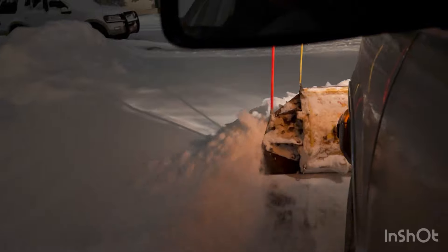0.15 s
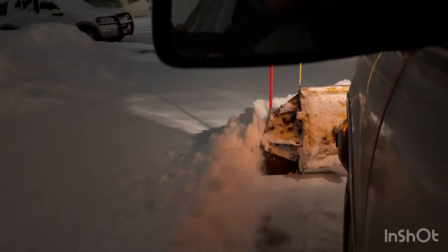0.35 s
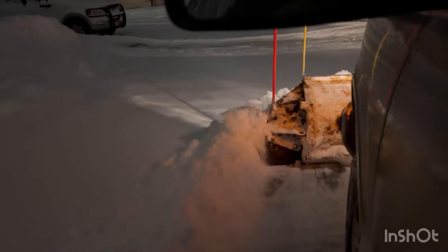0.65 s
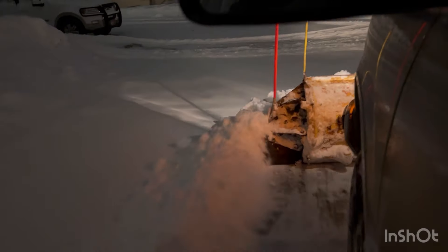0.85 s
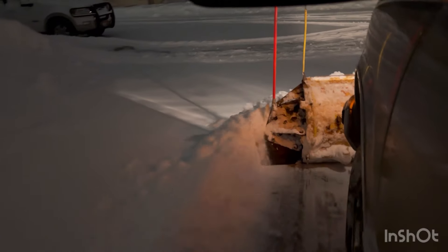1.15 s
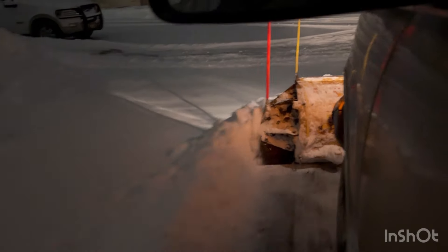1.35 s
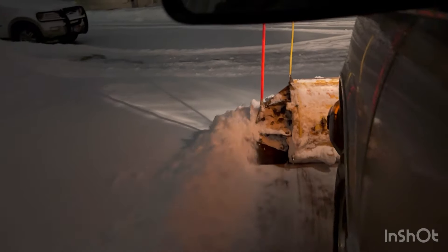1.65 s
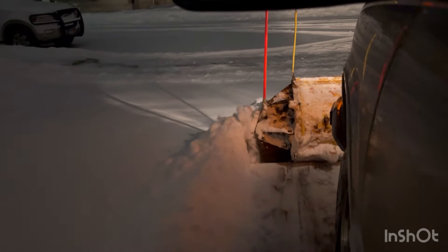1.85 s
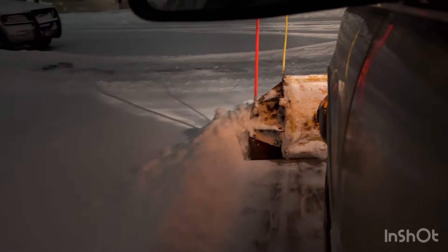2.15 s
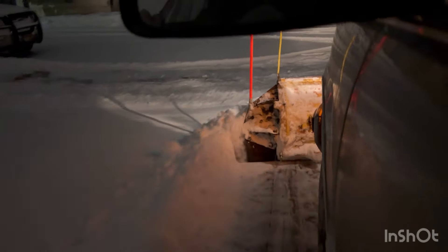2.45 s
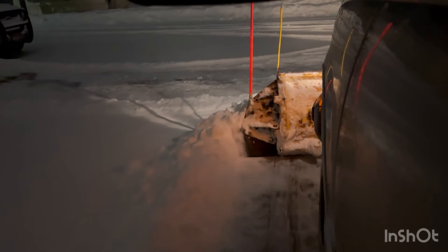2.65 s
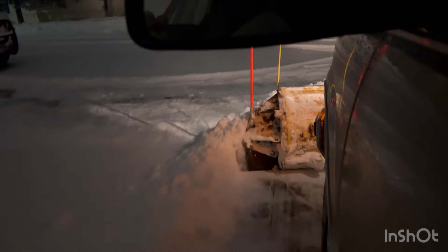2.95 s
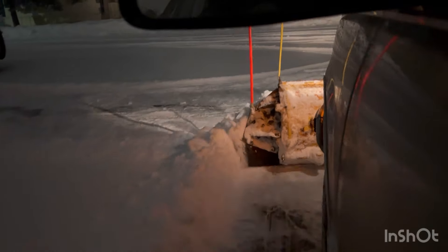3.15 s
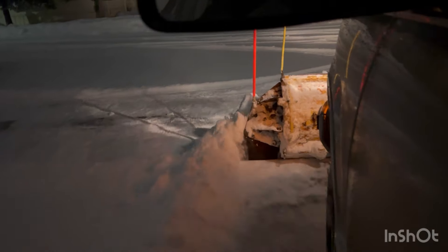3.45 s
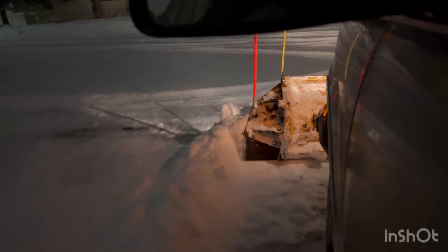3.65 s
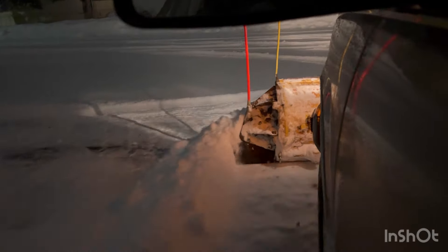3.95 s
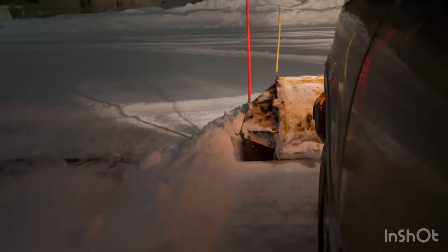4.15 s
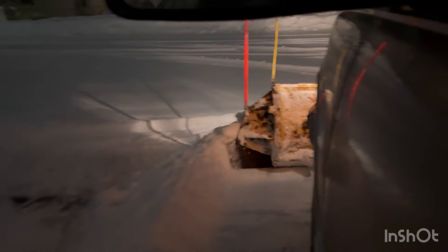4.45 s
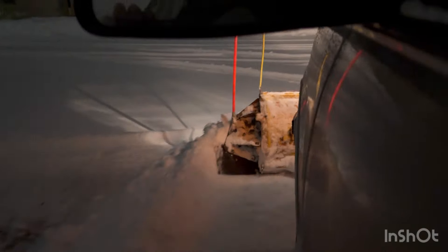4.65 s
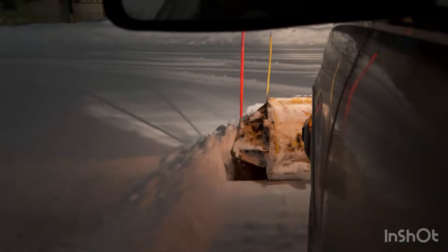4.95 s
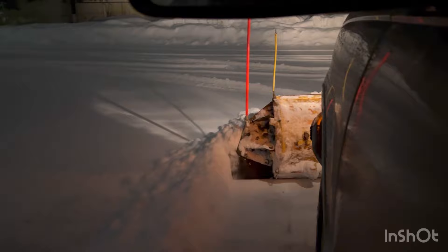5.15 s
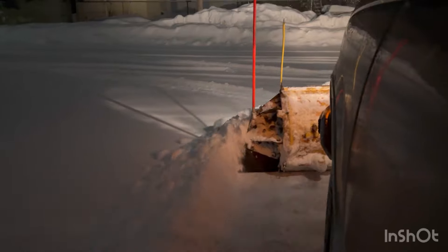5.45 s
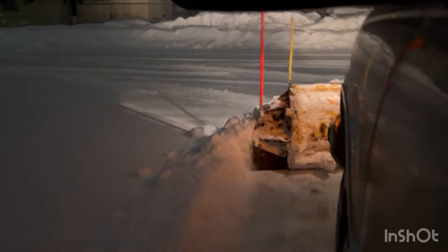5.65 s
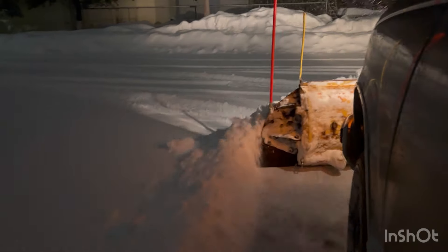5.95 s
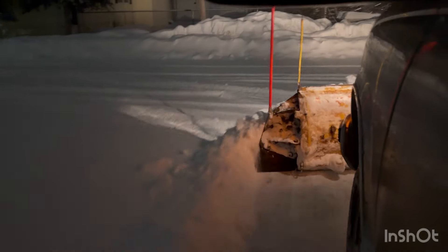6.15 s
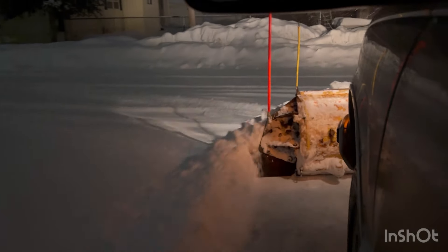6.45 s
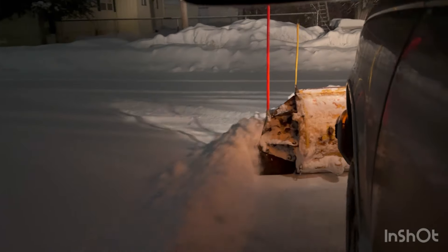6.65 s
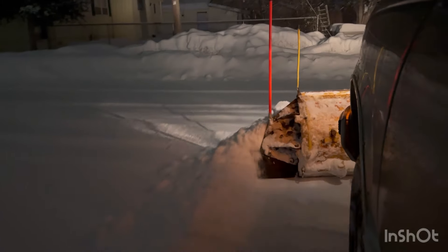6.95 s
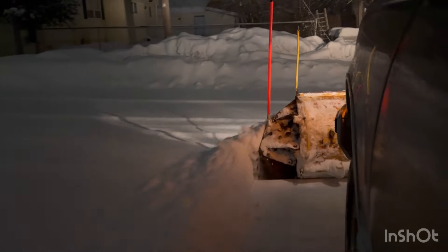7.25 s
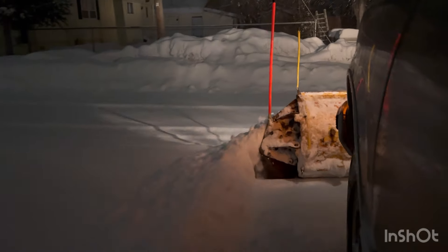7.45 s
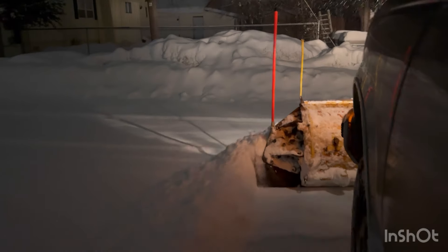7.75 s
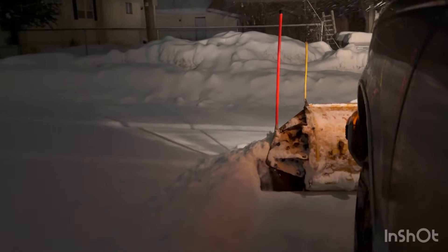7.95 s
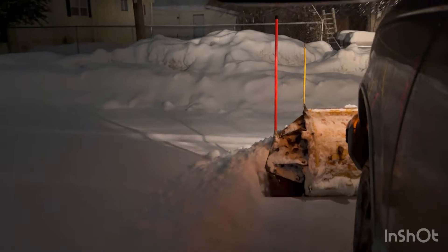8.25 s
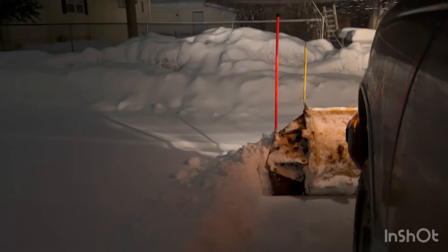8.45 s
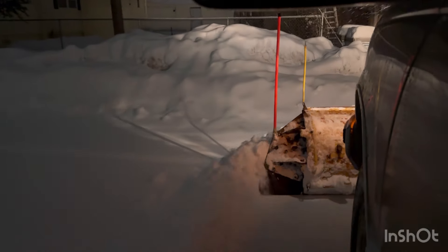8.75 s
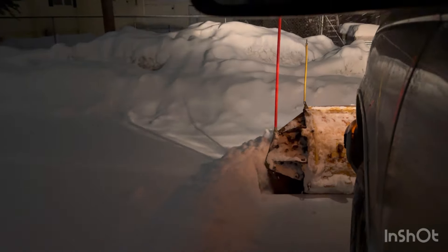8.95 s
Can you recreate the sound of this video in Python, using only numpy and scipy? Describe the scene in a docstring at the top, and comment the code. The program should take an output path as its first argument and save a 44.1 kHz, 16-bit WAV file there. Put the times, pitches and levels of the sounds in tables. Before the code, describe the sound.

Close outdoor stereo from a phone at a pickup's window. Throughout, a low V8 exhaust throbs with an uneven burble over a dull fan and tyre rush. From 0.1 s the steel plow blade drags in short, irregular judders: hollow booms, mid grinding, snow crunch, faint grit hiss and splintery ticks, strongest around 0.6-1.1 s as revs rise. From 1.2 to 4 s the scraping continues while revs slowly ease, with low catches, cracking crust and stones knocking on steel, clustered near 3.1-3.9 s. About 4.2-5 s it thins to a smoother glide, with one stone knock near 4.65. At 5-6 s the engine surges higher and rough scraping and cracks return. From 6 s, softer rolling crunch and powder spray dominate; revs stay high until 6.8, fall by 7.6, lift slightly around 8.3, then drop and weaken toward 9 s, with a few last grit ticks.

```python
"""Pickup plowing fresh snow

A V8 pickup pushes a steel plow, heard in stereo from a phone held out of the driver's window.
The exhaust throbs as sines on eighths of the firing rate. The blade edge judders over the ground:
noise and random impacts through resonances give boom, grind, snow crunch, grit hiss and spray.
Short fading sines are the edge's catches and the crust's cracks; noise bursts are grit and stones on steel."""
import sys
import numpy as np
from scipy import signal
from scipy.fft import rfft, irfft, next_fast_len
from scipy.io import wavfile
from scipy.ndimage import uniform_filter1d

SR = 44100
rng = np.random.default_rng(int(sys.argv[2]) if len(sys.argv) > 2 else 0)


def generate_wav(sig):
    """Save sig (samples, or channels by samples) to the path in sys.argv[1] as 16-bit PCM at SR."""
    pcm = np.round(np.clip(np.atleast_2d(sig).T, -1, 1) * 32767).astype(np.int16)
    wavfile.write(sys.argv[1], SR, pcm)


N = 400690

# treble resonances of the steel blade: pitch_hz, width_hz, level_db
STEEL_MODES = [(1930, 1200, 12), (3420, 1280, 12.5), (4990, 1660, 10), (7480, 3430, 4.5), (10560, 430, -5),
               (14600, 20500, -5)]


def undb(db):
    """Decibels to amplitude."""
    return 10 ** (np.asarray(db) / 20)


def unit(x):
    """Scale to rms 1."""
    return x / np.sqrt(np.mean(x ** 2))


def curves(table):
    """Columns of a time table, one value a sample."""
    s, *columns = np.transpose(table)
    return [np.interp(np.arange(N) / SR, s, column) for column in columns]


def over_log_hz(hz, table):
    """Second column of a frequency table, straight lines over log frequency."""
    table_hz, db = np.transpose(table)
    return np.interp(np.log(hz + 1), np.log(table_hz), db)  # + 1 avoids log 0


def body(x, modes):
    """Sum of steep resonances (each applied twice), neighbours in opposite sign."""
    out = 0
    for k, (hz, width_hz, db) in enumerate(modes):
        b, a = signal.iirpeak(hz, hz / width_hz, SR)
        ring = signal.lfilter(b, a, signal.lfilter(b, a, x))
        out = out + (-1) ** k * undb(db) * ring
    return out


def wavering_body(x, modes, waver_db, rate_hz):
    """Like body, but each resonance swells by itself."""
    out = 0
    for k, mode in enumerate(modes):
        swell = undb(waver_db * walk(rate_hz))
        out = out + (-1) ** k * swell * body(x, [mode])
    return out


def walk(rate_hz):
    """Random levels held 1 / rate_hz s and slewed twice; spread near 1."""
    k = int(SR / rate_hz)
    steps = np.repeat(rng.standard_normal(N // k + 1), k)
    return 1.5 * uniform_filter1d(uniform_filter1d(steps, k), k)[:N]


def grains(rate_hz, spread_db, smear_s):
    """Random impacts, many small and few large, each a short decaying burst of noise."""
    when, size, noise = rng.random(N), rng.exponential(size=N), rng.standard_normal(N)
    hits = (when < rate_hz / SR) * undb(spread_db * np.minimum(size, 5.0))
    envelope = signal.lfilter([1], [1, -np.exp(-1 / (smear_s * SR))], hits)
    return unit(envelope * noise)


def rings(table, rise_s, decay_s):
    """Each blow is a few fading cycles at its own pitch."""
    out, t = np.zeros(N + SR), np.arange(SR // 8) / SR
    envelope = np.exp(-t / decay_s) * (1 - np.exp(-t / rise_s))
    for start_s, db, hz in table:
        i = int(start_s * SR)
        out[i:i + len(t)] += undb(db) * np.sin(2 * np.pi * hz * t) * envelope
    return out[:N]


def engine():
    """Exhaust tones ride on the firing rate: it and its octave nearly steady, the others unsteady."""
    # engine speed: time_s, firing_rate_hz
    speed = [(0.1, 50.5), (0.3, 52.0), (0.7, 60.8), (0.85, 63.3), (1.1, 61.7), (2, 60.8), (3.5, 56.3),
             (4.7, 56.9), (4.95, 60.0), (5.4, 68.7), (5.6, 71.5), (6.2, 74.9), (6.75, 75.3), (7.2, 59.1),
             (7.6, 53.7), (7.9, 54.6), (8.15, 58.8), (8.35, 59.6), (8.55, 58.8), (8.75, 53.8), (9.0, 44.5)]
    # engine load: time_s, exhaust_level_db
    load = [(0.0, -22.5), (0.9, -19), (2.6, -20.5), (3.3, -19.5), (3.9, -21.5), (4.05, -23), (5.0, -22),
            (5.16, -16.5), (5.39, -23), (5.54, -18.5), (6.83, -18), (7.16, -22.5), (7.6, -22),
            (8.33, -19.5), (8.86, -22.5), (9.05, -29)]
    # exhaust tones, in eighths of the firing rate; unequal banks give all but 8 and 16
    eighths = [5, 6, 7, 8, 9, 10, 11, 13, 16]
    # relative level of each tone at the reference rate: level_db
    eighths_db = [-11, -15.5, -24, -0.5, -15.5, -19.5, -12.5, -13.5, -17.5]
    # growth of each tone with the firing rate: slope_db_per_hz
    eighths_slope = [0.28, -0.1, 0.076, 0.01, 0.01, 0.065, 0.21, -0.18, 0.13]
    firings_a_cycle, reference_hz, speed_waver = 8, 60, 0.001
    steady_waver_db, bank_waver_db, bank_drift_rad = 0.6, 1.6, 0.35

    (hz,), (load_db,) = curves(speed), curves(load)
    wavering_hz = hz * (1 + speed_waver * walk(17))
    cycle_rad = 2 * np.pi * np.cumsum(wavering_hz / SR) / firings_a_cycle
    phases, tones = 2 * np.pi * rng.random(len(eighths)), 0
    for k, level_db, slope, phase in zip(eighths, eighths_db, eighths_slope, phases):
        uneven = k % firings_a_cycle > 0
        waver_db = (bank_waver_db if uneven else steady_waver_db) * walk(9)
        drift_rad = uneven * bank_drift_rad * walk(6)
        gain = undb(level_db + slope * (hz - reference_hz) + waver_db)
        tones = tones + gain * np.sin(k * cycle_rad + phase + drift_rad)
    return unit(tones) * undb(load_db)


def drags():
    """Gains of boom, grind and grit as the edge drops and drags: each drag rises, holds and dies away."""
    # drags on the ground: start_s, length_s, boom_db, grind_db, grit_db
    drag_table = [(0.113, 0.097, -20, -27, -51), (0.266, 0.23, -16.5, -30, -54),
                  (0.621, 0.11, -16, -29, -46.5), (0.771, 0.15, -14.5, -25.5, -42),
                  (0.966, 0.12, -15, -27.5, -46.5), (1.156, 0.19, -24, -32.5, -49),
                  (1.282, 0.068, -16.5, -29.5, -55), (1.432, 0.46, -20, -31.5, -51.5),
                  (1.989, 0.19, -16.5, -30.5, -49.5), (2.242, 0.38, -15.5, -26, -50.5),
                  (2.696, 0.1, -15.5, -29.5, -49.5), (2.889, 0.12, -19.5, -32, -53),
                  (3.093, 0.22, -17, -27, -50.5), (3.317, 0.085, -20, -26.5, -54),
                  (3.461, 0.052, -18, -23, -45.5), (3.572, 0.38, -22, -29.5, -54),
                  (3.87, 0.18, -21.5, -29, -53), (4.222, 0.15, -25.5, -40.5, -56),
                  (5.041, 0.29, -20, -28, -54), (5.317, 0.088, -18, -25, -47.5),
                  (5.468, 0.0096, -24.5, -31, -46.5), (5.548, 0.084, -17, -26, -47.5),
                  (5.66, 0.23, -21, -26.5, -49), (5.836, 0.19, -23, -27.5, -49),
                  (6.784, 0.18, -30, -39, -59)]
    attack_s, release_s = 0.0091, 0.049
    t, power = np.arange(N) / SR, 0
    for start_s, length_s, *db in drag_table:
        attack = np.clip((t - start_s) / attack_s, 0, 1)
        release = np.exp(-np.clip(t - start_s - length_s, 0, None) / release_s)
        power = power + (undb(db)[:, None] * attack * release) ** 2
    return np.sqrt(power)


def blade_boom(lumps, slide, drag_gain, glide_gain, judder):
    """Low rings of the blade: lumpy and juddering in a drag, even in a glide."""
    # low blade resonances: pitch_hz, width_hz, level_db
    blade_modes = [(82.6, 46, -1.5), (177.7, 148.6, 2), (222.4, 194, 1), (333.6, 156, 0.5)]
    dragging = unit(wavering_body(lumps, blade_modes, waver_db=1.5, rate_hz=20))
    gliding = unit(body(slide, blade_modes))
    return dragging * drag_gain * undb(0.29 * judder) + gliding * glide_gain


def edge_grind(lumps, slide, drag_gain, glide_gain, judder):
    """The same impacts and slide excite the edge's middle rings; judder shakes the drag part harder."""
    # edge resonances: pitch_hz, width_hz, level_db
    edge_modes = [(473.5, 145, 2.5), (653, 213, 3.5)]
    dragging = unit(body(lumps, edge_modes))
    gliding = unit(body(slide, edge_modes))
    return dragging * drag_gain * undb(1.9 * judder) + gliding * glide_gain


def snow_crunch(gain, judder, crunch_judder):
    """Packed snow breaks in dense small impacts through separately swelling resonances."""
    # packed-snow resonances: pitch_hz, width_hz, level_db
    snow_modes = [(827, 290, 0), (998, 295, -2), (1245, 330, -9)]
    packed = grains(2200, 0.98, 0.003)
    crunch = unit(wavering_body(packed, snow_modes, waver_db=1.2, rate_hz=9))
    return crunch * gain * undb(0.7 * judder + 1.0 * crunch_judder)


def grit_hiss(gain, judder, hiss_judder):
    """Grit strikes the steel: common coarse grains, with fine grains and noise drawn for each ring."""
    coarse, sand = grains(200, 3.4, 0.0052), 0
    for k, mode in enumerate(STEEL_MODES):
        fine = grains(250, 5.3, 0.0015)
        strikes = 0.3 * rng.standard_normal(N) + 0.46 * coarse + 0.26 * fine
        sand = sand + (-1) ** k * body(strikes, [mode])
    return unit(sand) * gain * undb(0.63 * judder + 0.83 * hiss_judder)


def powder_spray(gain):
    """Loose snow sprays off as fine grains through two broad resonances."""
    # powder resonances: pitch_hz, width_hz, level_db
    powder_modes = [(1365, 910, 10.5), (2950, 1900, -11.5)]
    return unit(body(grains(1200, 3.5, 0.0015), powder_modes)) * gain


def scrape(judders, drag_gains):
    """The edge sticks and slips: one uneven judder shakes boom, grind, crunch and hiss together."""
    # edge gliding on packed snow between drags: time_s, boom_db, grind_db, grit_db
    glide = [(0.0, -24.5, -33, -51.5), (2.0, -35, -44, -52.5), (4.1, -32.5, -36.5, -55),
             (4.55, -36, -41, -65.5), (5.0, -29.5, -38, -60), (6.15, -34, -46.5, -54.5),
             (6.55, -31.5, -36.5, -50.5), (6.8, -31, -37, -51.5), (7.2, -32, -38.5, -55.5),
             (8.1, -36, -38, -55.5), (9.09, -44, -39.5, -59)]
    # snow rolling along the blade: time_s, crunch_db, spray_db
    roll = [(0.0, -45, -47.5), (0.3, -28.5, -41.5), (0.6, -38.5, -43.5), (1.1, -37.5, -41.5),
            (1.55, -27.5, -51.5), (1.95, -38, -42.5), (2.66, -33, -41.5), (3.05, -34.5, -45.5),
            (3.4, -36, -35.5), (3.65, -32.5, -42.5), (4.13, -37, -42), (4.6, -37, -49), (4.9, -33, -47),
            (5.4, -30, -43.5), (5.5, -30.5, -46), (5.75, -30, -40), (6.15, -34, -44), (6.45, -32.5, -46.5),
            (6.6, -27, -47), (6.76, -30, -44), (6.88, -26, -58), (7.1, -32.5, -63), (7.3, -26, -45),
            (7.42, -30, -38), (7.52, -27.5, -44), (7.75, -34.5, -43.5), (8.08, -37, -41.5),
            (8.2, -28.5, -40), (8.3, -33.5, -41), (8.76, -36.5, -49), (9.09, -40.5, -49)]
    drag_crunch_db = -5.5  # crunch added by a drag, against its grind
    judder, crunch_judder, hiss_judder = judders
    drag_boom, drag_grind, drag_grit = drag_gains
    glide_boom, glide_grind, glide_grit = undb(curves(glide))
    roll_crunch, spray_gain = undb(curves(roll))
    crunch_gain = np.hypot(roll_crunch, drag_grind * undb(drag_crunch_db))
    grit_gain = np.hypot(drag_grit, glide_grit)

    lumps, slide = grains(1800, 2.4, 0.00059), rng.standard_normal(N)
    boom = blade_boom(lumps, slide, drag_boom, glide_boom, judder)
    grind = edge_grind(lumps, slide, drag_grind, glide_grind, judder)
    crunch = snow_crunch(crunch_gain, judder, crunch_judder)
    grit = grit_hiss(grit_gain, judder, hiss_judder)
    return boom + grind + crunch + grit + powder_spray(spray_gain)


def edge_catches():
    """The edge catches on the ground and the blade booms: short low rings."""
    # catches: start_s, level_db, pitch_hz
    catch_table = [(0.145, 4.5, 185), (0.2, -1, 151), (0.305, 3, 154), (0.437, -7, 313), (0.611, -8, 346),
                   (0.666, -1, 290), (0.7, 7, 242), (0.778, 2, 206), (0.996, 3.5, 203), (1.031, 3.5, 235),
                   (1.083, 6.5, 234), (1.151, -0.5, 219), (1.287, -5, 370), (1.308, -0.5, 382),
                   (1.385, -6, 366), (1.615, 3, 300), (1.65, -1, 224), (1.708, 3.5, 303), (1.779, 3, 222),
                   (1.833, -4, 217), (1.985, -2, 264), (2.102, 1, 209), (2.142, -4, 289), (2.25, -5, 328),
                   (2.295, 0.5, 278), (2.322, 0, 312), (2.378, 4, 239), (2.45, 3.5, 315), (2.503, 3, 303),
                   (2.538, 0, 200), (2.63, -0.5, 322), (2.714, -1, 302), (2.738, -3, 303), (2.81, 0, 326),
                   (2.908, -2, 210), (2.954, 2, 207), (2.991, -12, 323), (3.054, -1.5, 279),
                   (3.125, 6, 296), (3.181, -2.5, 200), (3.255, 1, 302), (3.305, -9, 290),
                   (3.344, 5.5, 178), (3.464, 0, 148), (3.51, -8, 231), (3.878, -2, 232), (3.91, -1.5, 150),
                   (3.95, -5, 157), (3.99, -2, 208), (4.051, -1, 206), (4.114, -8.5, 154), (5.048, -3, 193),
                   (5.082, -10, 200), (5.14, 0, 189), (5.325, -15, 275), (5.354, -12, 164),
                   (5.486, -5, 220), (5.564, -2, 192), (5.595, 3, 194), (5.627, -6, 182), (5.795, 0, 313),
                   (5.859, -1, 330), (5.885, 0, 340), (5.948, -0.5, 261), (6.043, -3.5, 184),
                   (6.89, -2.5, 294)]
    return rings(catch_table, rise_s=0.0061, decay_s=0.0079)


def crust_cracks():
    """Crusted snow cracks under the edge: higher, shorter rings with a spike in front."""
    # cracks: start_s, level_db, pitch_hz
    crack_table = [(0.24, -10, 940), (0.639, -12.5, 635), (0.667, -16, 556), (0.776, -10.5, 490),
                   (0.81, -8, 644), (0.932, -7, 496), (0.965, -13, 590), (1.342, -13, 676),
                   (1.777, -10, 684), (2.244, -11.5, 600), (2.316, -10, 650), (2.45, -7, 654),
                   (2.507, -13.5, 760), (2.564, -13.5, 624), (2.726, -9.5, 600), (2.81, -6.5, 680),
                   (2.954, -13, 720), (3.166, -15.5, 570), (3.263, -19, 513), (3.66, -12.5, 690),
                   (3.713, -11, 560), (3.851, -18, 730), (4.877, -16, 920), (5.046, -14, 590),
                   (5.073, -15, 590), (5.134, -9, 617), (5.283, -15, 580), (5.328, -11, 545),
                   (5.357, -3, 690), (5.54, -17, 750), (5.56, -3, 610), (5.595, -2, 710),
                   (5.646, -15.5, 740), (5.66, -11, 1120), (5.853, -8.5, 464), (6.878, -13, 940),
                   (7.2, -16, 950), (7.281, -12, 1010), (7.529, -11.5, 885), (8.206, -12.5, 950)]
    spike_db = -6  # against the ring
    ring = rings(crack_table, rise_s=0.0004, decay_s=0.0039)
    return ring + undb(spike_db) * rings(crack_table, rise_s=0.00015, decay_s=0.0004)


def click_burst(t, t60_s, rise_s):
    """A splintering noise burst, with loose splinters rattling on in a weak tail."""
    tail_db, tail_t60_s = -21.5, 0.22
    crackle_db, splinter_s = 1.2, 0.0016
    decay = np.exp(-np.log(1000) * t / t60_s)
    tail = undb(tail_db) * np.exp(-np.log(1000) * t / tail_t60_s)
    rise = 1 - np.exp(-(t / rise_s) ** 2)
    splinter_sizes = rng.exponential(size=len(t))[(t / splinter_s).astype(int)]
    return (decay + tail) * rise * rng.standard_normal(len(t)) * undb(crackle_db * splinter_sizes)


def clicks():
    """Bursts ring the steel's treble, each of its own colour and length; a stone knocks under it."""
    # grit and ice splinters on steel: start_s, peak_db, favoured_ring_hz, t60_ms
    tick_table = [(0.109, -26.5, 4750, 10), (0.162, -32, 5250, 22), (0.178, -32, 3700, 15),
                  (0.464, -29, 6040, 7.1), (0.482, -31, 6540, 15), (0.702, -31.5, 5010, 22),
                  (0.728, -25, 6000, 17), (0.764, -27, 3640, 35), (0.82, -28, 4500, 10),
                  (0.841, -23.5, 3680, 24), (0.852, -32, 5030, 15), (0.87, -36, 4500, 24),
                  (0.915, -38, 5000, 13), (1.0834, -41, 3630, 40), (3.292, -41, 6000, 40),
                  (3.3576, -20, 4600, 15), (3.4014, -30.5, 3720, 40), (3.465, -31, 4500, 24),
                  (3.779, -33, 5430, 15), (3.92, -30, 5800, 12), (4.003, -32, 5000, 11),
                  (4.011, -35, 7000, 45), (5.5227, -30.5, 5500, 11), (5.9495, -33, 3800, 5.7),
                  (6.631, -31, 7000, 45), (8.6374, -29, 5000, 47), (9.0341, -31, 3950, 7.9),
                  (9.057, -32, 4230, 6)]
    # stones on steel: start_s, peak_db, favoured_ring_hz, t60_ms, knock_peak_db, knock_hz
    stone_table = [(1.7753, -28, 5100, 38, -17, 1800), (1.8307, -36, 3500, 45, -28, 1830),
                   (2.108, -24, 5100, 19, -14, 1740), (2.293, -36.5, 5000, 45, -21.5, 1860),
                   (2.3276, -31, 6960, 35, -24, 1850), (2.437, -24.5, 5300, 22, -20, 1860),
                   (2.7287, -38, 4000, 30, -19, 1630), (3.117, -29, 5030, 30, -17, 1820),
                   (3.171, -31.5, 5000, 27, -21.5, 2760), (3.2738, -30, 6500, 38, -20, 2090),
                   (3.337, -26.5, 3830, 45, -17, 1980), (3.5, -29, 4020, 20, -27, 1730),
                   (3.514, -31, 5500, 35, -23, 1880), (3.527, -37, 4500, 38, -26, 1880),
                   (3.6643, -33.5, 3770, 30, -24, 1700), (3.7047, -23, 5500, 36, -25.5, 2100),
                   (3.8783, -24, 3150, 22, -19, 2300), (3.8875, -23.5, 3840, 26, -14.5, 2200),
                   (4.0616, -29.5, 5500, 14, -23, 2400), (4.6517, -27.5, 3300, 20.5, -16, 2200),
                   (5.3396, -33, 5000, 45, -22, 2230), (5.355, -30.5, 3740, 40, -16, 1920),
                   (5.5616, -36, 4700, 31, -18, 1680), (5.5954, -36, 3700, 45, -20.5, 1810),
                   (5.9656, -34, 5070, 12, -23, 1680)]
    # knock resonances: pitch_hz, width_hz, level_db
    knock_modes = [(1265, 360, 7.5), (595, 710, 8)]
    rise_share, colour_db = 0.11, 3  # rise as a share of t60; random spread of each steel ring
    ring_db, ring_q = 14, 7
    knock_ring_db, knock_q = 5, 3.5
    out, t = np.zeros(N + SR), np.arange(SR // 6) / SR
    for start_s, db, hz, t60_ms, *stone in tick_table + stone_table:
        t60_s = t60_ms / 1000
        rise_s = rise_share * t60_s
        burst = click_burst(t, t60_s, rise_s)
        colours_db = colour_db * rng.standard_normal(len(STEEL_MODES))
        steel = np.array(STEEL_MODES) + np.outer(colours_db, [0, 0, 1])
        snap = body(burst, steel) + body(burst, [(hz, hz / ring_q, ring_db)])
        sound = undb(db) * snap / np.abs(snap).max()
        if stone:
            knock_db, knock_hz = stone
            own_mode = (knock_hz, knock_hz / knock_q, knock_ring_db)
            knock = body(burst, [own_mode] + knock_modes)
            sound = sound + undb(knock_db) * knock / np.abs(knock).max()
        i = int((start_s - rise_s / 2) * SR)
        out[i:i + len(t)] += sound
    return out[:N]


def fan_and_tyres():
    """Cooling fan, tyres and body rumble: a steady rush of noise bands."""
    # noise bands: pitch_hz, width_hz, rms_db
    bands = [(55, 30, -38), (109, 156, -31), (240, 400, -41.5), (620, 660, -41.5), (3500, 4400, -64.5)]
    rush = 0
    for hz, width_hz, db in bands:
        rush = rush + undb(db) * unit(body(rng.standard_normal(N), [(hz, width_hz, 0)]))
    return rush


def stereo(common, separate):
    """Left and right share one sound with phase and level differences, plus separate sound in each."""
    # phase between left and right channels: pitch_hz, left_lead_rad
    channel_phase = [(0, 0), (300, -.35), (1000, -.8), (1500, -1.9), (1800, -.6), (3300, -3.1),
                     (3960, -6.5), (4900, -5.7), (6300, -7.1), (7600, -5.7), (8010, -3.5), (8900, -3.1),
                     (10500, -.3), (11600, 0.1), (12500, 2.4), (13400, 3.2), (15300, 6.3), (22050, 6.3)]
    # level between left and right channels: pitch_hz, left_minus_right_db
    channel_db = [(60, 1.0), (250, 0.8), (700, -1.0), (1800, -0.3), (4400, -5.5), (15000, 0.0)]
    # separate sound against the common sound: pitch_hz, gain_db
    separate_db = [(30, -13), (120, -10), (300, -13), (600, -12.5), (1100, -10.5), (1600, -2.5), (2000, -3),
                   (5000, -2), (7800, 2.5), (8500, -39), (16000, -12.5)]
    size = next_fast_len(N + SR)
    hz = np.arange(size // 2 + 1) * SR / size
    separate_gain = undb(over_log_hz(hz, separate_db))
    tilt_db = over_log_hz(hz, channel_db) * np.array([[0.5], [-0.5]])
    lead_rad = np.interp(hz, *np.transpose(channel_phase)) * np.array([[1], [0]])
    heard = rfft(common, size) * np.exp(1j * lead_rad) + separate_gain * rfft(separate, size)
    heard = heard * undb(tilt_db) / np.sqrt(1 + separate_gain ** 2)
    return irfft(heard, size)[:, :N]


def scene():
    """One common mix, and separately drawn scrape, fan, tyre and click sound for each channel."""
    judders = [walk(28), walk(23), walk(6.0)]  # common, crunch, hiss
    drag_gains = drags()
    common = engine() + scrape(judders, drag_gains) + fan_and_tyres()
    common = common + edge_catches() + crust_cracks() + clicks()
    separate = np.array([scrape(judders, drag_gains) + fan_and_tyres() + clicks() for _ in range(2)])
    return stereo(common, separate)


def record(dry):
    """The phone drops the deep bass, rounds the loudest peaks and cuts the top."""
    low_hz, top_hz, drive = 36.3, 15850, 0.7
    highpass = signal.butter(4, low_hz, "highpass", fs=SR, output="sos")
    lowpass = signal.ellip(10, 0.2, 80, top_hz, fs=SR, output="sos")  # ripple, stopband in dB
    rounded = np.tanh(drive * signal.sosfilt(highpass, dry)) / drive
    return signal.sosfilt(lowpass, rounded)


dry = scene()
out = record(dry)
generate_wav(out)
```